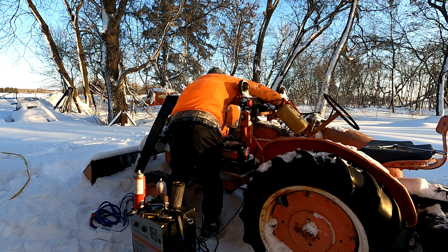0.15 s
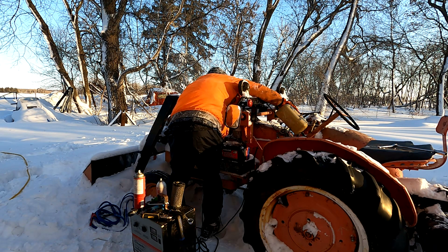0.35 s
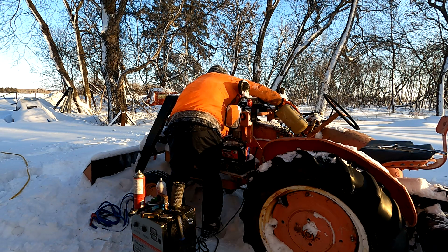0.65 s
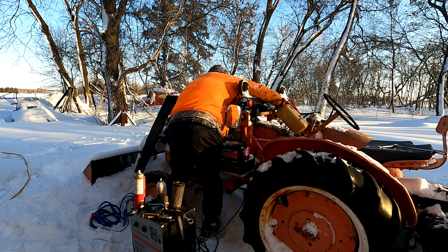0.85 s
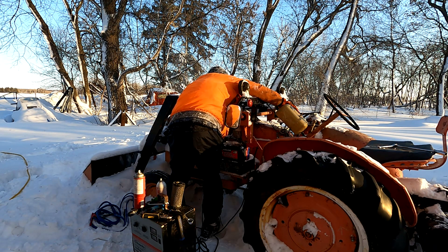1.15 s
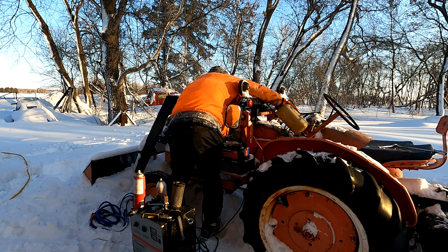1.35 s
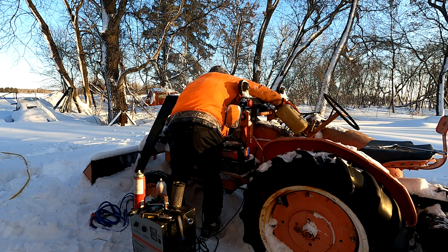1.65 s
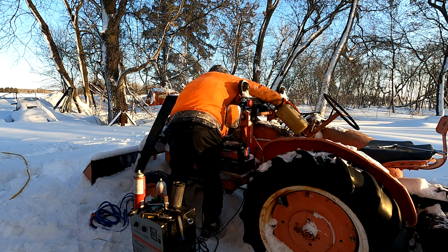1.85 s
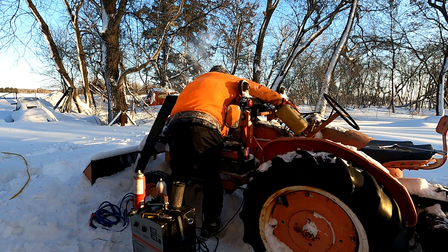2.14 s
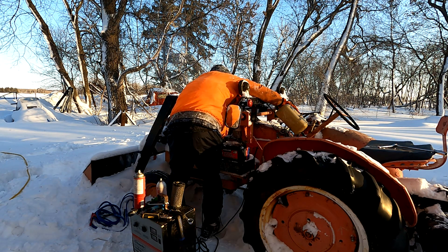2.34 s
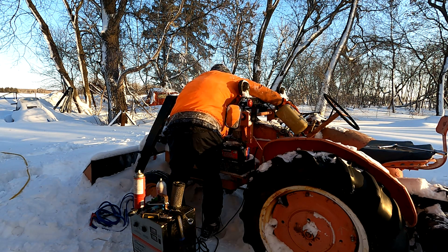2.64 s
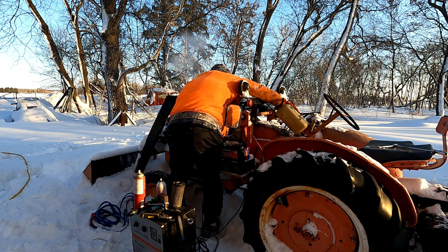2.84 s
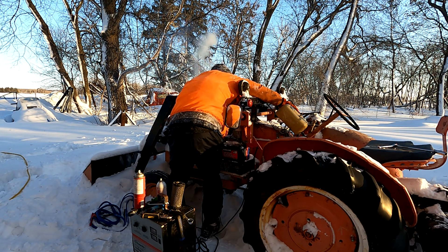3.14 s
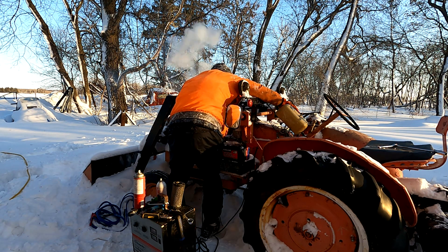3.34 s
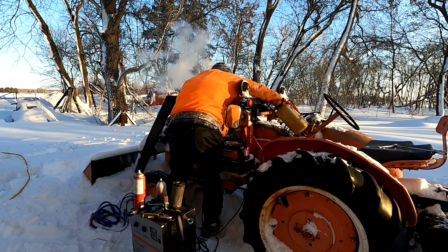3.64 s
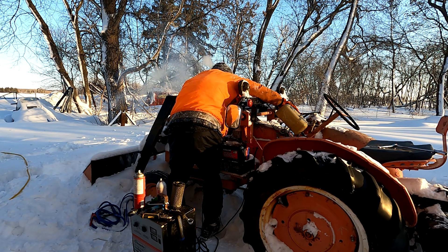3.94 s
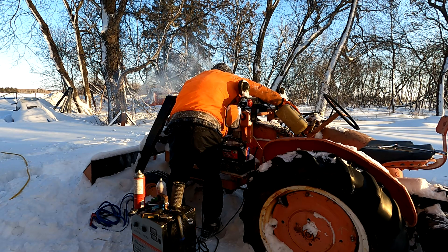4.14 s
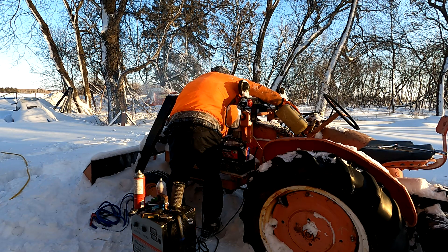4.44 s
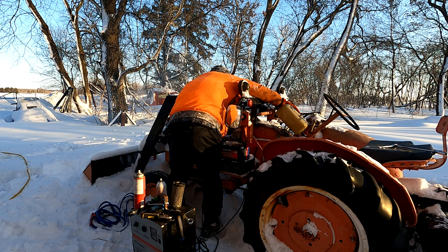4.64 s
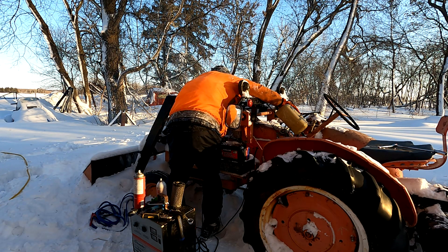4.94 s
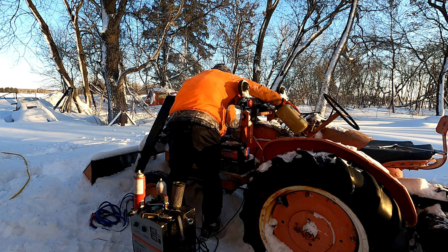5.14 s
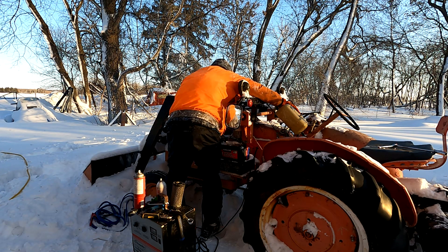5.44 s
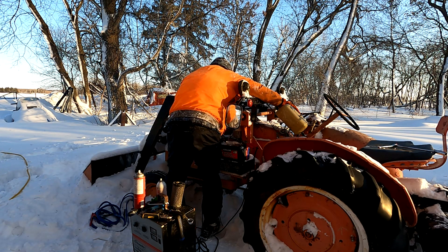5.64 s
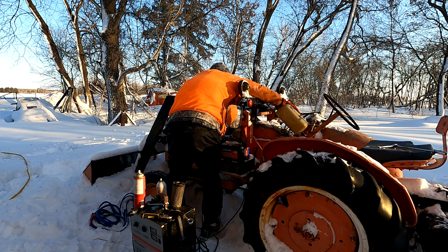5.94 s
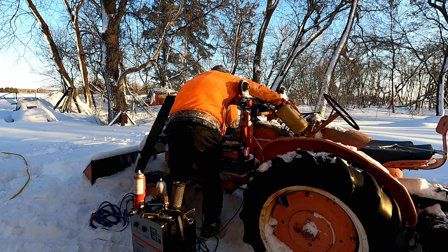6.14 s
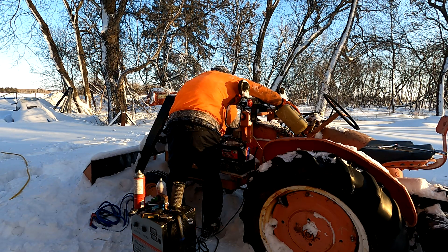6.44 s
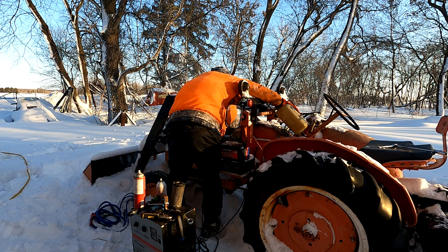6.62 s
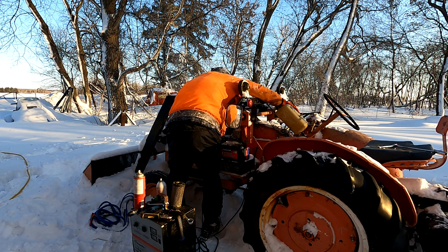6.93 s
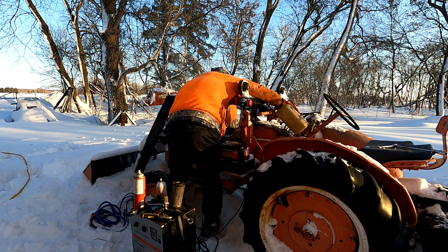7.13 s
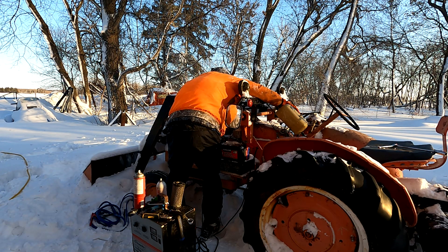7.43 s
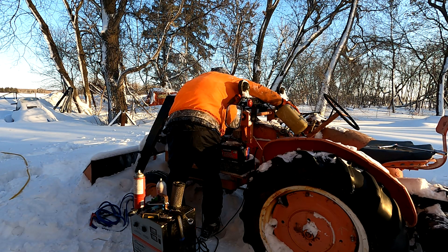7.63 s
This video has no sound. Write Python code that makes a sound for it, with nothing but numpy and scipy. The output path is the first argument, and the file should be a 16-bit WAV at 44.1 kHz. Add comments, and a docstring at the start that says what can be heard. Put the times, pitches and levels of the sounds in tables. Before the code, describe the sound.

Harsh gear-tooth grinding with low exhaust puffs and metallic clashes, then a freed starter motor races briefly, slows and fades into still winter air.

```python
"""Starting a cold tractor

An electric starter cranks a tractor engine: gear teeth grind, howl and clash, built from clicks and noise
ringing iron resonances. Cylinders puff into the exhaust as short low pulses, and some cough with added hiss.
The pinion (the starter's small gear) lets go; the freed starter races, slows and fades, as a stack of
tones tied to its speed plus rattle and brush noise. Quiet air and a humming battery charger run throughout."""
import sys
import numpy as np
from scipy import signal
from scipy.fft import rfft, irfft
from scipy.io import wavfile
from scipy.ndimage import uniform_filter1d

SR = 44100
rng = np.random.default_rng(int(sys.argv[2]) if len(sys.argv) > 2 else 0)


def unload_audio(sound):
    """Save the sound as a 16-bit wav file, at the path given as the first command line argument."""
    columns = np.transpose(np.atleast_2d(sound))
    # keep every value between -1 and 1, then stretch to whole-number steps
    steps = np.round(np.clip(columns, -1, 1) * 32767)
    wavfile.write(sys.argv[1], SR, steps.astype(np.int16))


N = 343098
T = np.arange(N) / SR  # time of every sample [s]

# Turning speed of the ring gear, dragged by the starter, then driven by coughs:
# (time [s], speed [teeth per second])
CRANK_SPEED = [(0, 335), (.18, 352), (.31, 385), (.45, 422), (1.94, 415), (2.06, 382), (2.2, 420),
               (2.72, 424), (2.86, 695), (4.2, 680)]
# Early coughs that throw the flywheel ahead: (time of top speed [s])
SURGES = [0.67, 1.45, 1.66, 2.26, 2.385]
# Course of each such surge: (time from its top [s], extra speed [teeth per second])
SURGE = [(-.17, 0), (0, 205), (.08, 120), (.16, 64), (.235, 56), (.3, 0)]
# Load on the starter, before the trims of each sound: (time [s], level [dB])
STARTER_LOAD = [(0, -22.5), (.7, -24.5), (1.1, -26), (2.07, -26.5), (2.11, -34.5), (2.37, -33),
                (2.43, -27.5), (2.67, -26.5), (2.71, -34), (2.9, -31.5), (4.14, -34.5), (4.3, -38.5)]
# Teeth clashing as the flywheel jerks ahead and falls back on the pinion:
# (middle time [s], level [dB], length [s], ringing note [Hz])
CLASHES = [(1.596, -21.5, 0.012, 1329), (2.167, -21, .032, 1921), (2.214, -24, 0.018, 1846),
           (2.258, -22, 0.039, 997), (2.357, -20.5, .027, 1390), (2.412, -24.5, 0.021, 1247),
           (2.502, -25, 0.015, 1087), (2.621, -29, .022, 839), (2.744, -21.5, 0.03, 1347),
           (2.789, -23.5, 0.044, 1103), (2.863, -23.5, .04, 1754), (2.974, -20.5, 0.035, 760),
           (3.042, -22.5, .032, 1896), (3.136, -24, 0.036, 882), (3.177, -24, .04, 894),
           (3.237, -21, 0.029, 1265), (3.308, -24, .05, 1150), (3.362, -29, .025, 2570),
           (3.441, -20.5, 0.039, 1440), (3.508, -21.5, .031, 1322), (3.557, -24, 0.042, 1114),
           (3.618, -29.5, 0.025, 2570), (3.699, -20, 0.048, 1354), (3.783, -22.5, .03, 1334),
           (3.834, -24, 0.033, 995), (3.888, -28.5, 0.023, 974), (3.985, -22, 0.058, 828),
           (4.073, -22, .027, 2550), (4.115, -23, 0.028, 1863), (4.155, -33, 0.024, 3057)]
# Barks of the bell housing: (middle time [s], pitch [Hz], level [dB])
BARKS = [(2.79, 560, -23.5), (2.853, 590, -22), (3.303, 576.3, -17.5), (3.56, 540, -23), (3.772, 580, -25),
         (3.823, 540, -17), (3.98, 554, -23), (4.06, 592, -24), (4.105, 560, -21.5)]
# Resonances of the iron castings: (frequency [Hz], width [Hz], boost [dB])
IRON = [(485.7, 15.6, 15.5), (607, 125, 7.5), (837, 52, 7), (912, 13, 6.5), (984, 22, 5.5), (1061, 12, 9),
        (1153, 18, 6), (1204, 13, 5.5), (1317, 62, 8.5), (1685, 14, 7), (1740, 10, 7.5), (1832, 65, 6.5),
        (1926, 37, 5), (2090, 80, 4), (2390, 42, 2), (2540, 94, 9.5), (2720, 62, 6), (3390, 140, 6)]
# Low resonances of the starter housing and sheet metal:
# (frequency [Hz], width of each filter pass [Hz], relative level [dB])
HOUSING = [(272.4, 15.7, -6.5), (290, 29, -3.5), (348.2, 33.7, 3), (482.5, 18.6, -2.5)]
# The howl swells where the teeth meet a resonance: (frequency [Hz], gain [dB])
HOWL = [(190, -32), (250, -22), (276, -15.5), (320, -26.5), (347, -13), (385, -30.5), (440, -31.5),
        (478, -14), (505, -22), (545, -23), (630, -27.5), (740, -38.5)]
# Cylinders that cough into the exhaust: (time [s], thump level before trim [dB])
COUGHS = [(0.492, -16), (0.582, -17.5), (0.657, -19.5), (1.352, -14.5), (1.437, -14.5), (1.587, -17.5),
          (1.654, -17), (2.111, -15), (2.245, -13.3), (2.31, -15), (2.714, -17), (2.865, -13.5),
          (2.927, -14), (3.113, -15), (3.239, -15.5), (3.364, -16), (3.618, -15), (3.886, -15),
          (4.153, -14)]
# Hiss grows faster than thump: (thump level before trim [dB], hiss level before trim [dB])
HISS_LAW = [(-33.5, -52.5), (-17, -42), (-13.5, -32.5)]
# Orders of the shaft, first order first:
# (coasting level [dB], extra under power [dB], loss below the smooth speed [dB per Hz])
SHAFT_ORDERS = [(3.5, -3, 0), (0, 13.5, 1.1), (-2, 14.5, 1.2), (1, 8.5, 2), (-9.5, 1, 0), (-11, 8.5, 0),
                (-13.5, 4, 0.5), (-19, 12.5, 0.5)]
# Resonances of the frame, through which the orders glide: (frequency [Hz], gain [dB])
FRAME = [(31, -46.5), (44, -29.5), (51, -43), (67, -23), (77, -42), (85, -28), (104, -36.5), (136, -27),
         (160, -37.5), (180, -55.5), (200, -30), (222, -38), (243, -47), (265, -29.5), (288, -27.5),
         (312, -29), (345, -21.5), (368, -25.5), (388, -36.5), (402, -36.5), (440, -37), (495, -29.5),
         (550, -36.5), (620, -26), (720, -37.5), (830, -29.5)]
# Short ringing notes: knocks on the metalwork, and at 2.03 s the howl dipping through a resonance:
# (time [s], pitch [Hz], level [dB], time to fall 60 dB [s])
RINGING_NOTES = [(0.432, 143, -16, 0.17), (2.028, 352, -11, 0.21), (3.675, 347, -12, 0.29),
                 (6.325, 362, -41, 0.7), (6.865, 352, -45, 0.76)]
# Notes of a faint high metallic ring: (pitch [Hz], relative level [dB], time to fall 60 dB [s])
HIGH_RING = [(3752, 0, .14), (5852, -2, .2), (7467, -10, .12), (10060, -16, .1)]
# Soft bumps of the chassis: (time [s], relative level [dB])
BUMPS = [(4.565, -31), (6.47, -45), (6.52, -41), (6.56, -47), (6.745, -39), (6.82, -49), (6.975, -47),
         (7.015, -52), (7.24, -67)]
# Faint crunching scuffs: (peak time [s], level [dB], rise [s], fall [s])
SCUFFS = [(6.275, -39, 0.11, 0.085), (6.768, -45.5, 0.01, 0.065), (7.137, -47.5, 0.011, 0.05),
          (7.24, -49.5, 0.017, 0.054), (7.372, -51.5, 0.025, 0.07), (7.572, -51.5, 0.044, 0.038)]
# Hum of the battery charger: (frequency [Hz], level [dB])
HUM = [(119.5, -52.5)]

# Tone colours of the noises, all: (frequency [Hz], relative level [dB])
# loaded gear teeth
GRIND = [(60, -9.5), (130, -7.5), (225, -2.5), (290, -9.5), (420, 0.5), (720, -3.5), (1200, -1.5),
         (2250, -5.5), (3100, -9.5), (4000, -12), (5000, -14.5), (6000, -21), (8300, -24), (10500, -39.5),
         (12500, -37.5), (15500, -56)]
# bright hissing noise at the start: (frequency [Hz], relative level [dB])
OPENING_HISS = [(500, -3), (1100, 26.5), (1500, 13.5), (3000, 6.5), (5500, 2), (7300, 2), (9000, -8),
                (10500, -5.5), (14000, -34)]
# hiss of coughs, also used for the pinion's tick: (frequency [Hz], relative level [dB])
COUGH = [(80, 8), (200, 19), (320, 20.5), (500, 18), (1300, 3), (2500, 15.5), (4500, 9), (7500, 4),
         (9000, -0.5), (11000, -9.5), (12500, -7), (15500, -21)]
# rattle of the free rotor: (frequency [Hz], relative level [dB])
RATTLE = [(120, 2), (230, -4.5), (330, 4.5), (430, -1.5), (600, -1.5), (1000, -6), (1500, -12.5),
          (2500, -15.5), (3300, -20.5), (4500, -25.5), (8000, -32.5), (10500, -47), (12500, -48),
          (15500, -57.5)]
# starter brushes: (frequency [Hz], relative level [dB])
BRUSH = [(1500, -10), (2800, -3), (3500, 8.5), (4400, 8.5), (6000, -8), (8000, -16), (14000, -20)]
# scuffs: (frequency [Hz], relative level [dB])
SCUFF = [(150, -6.5), (330, 16), (750, 2.5), (1200, -1), (2000, -12.5), (5000, -24), (12000, -43)]
# still air: (frequency [Hz], relative level [dB])
AIR = [(20, 13), (45, 5), (90, 2.5), (190, -0.5), (340, 3.5), (450, -6), (800, -22.5), (1200, -9.5),
       (2100, -19), (3400, -14.5), (7500, -23.5), (10500, -34), (12200, -36.5), (15500, -54.5)]

# Stereo spread with the image fully open: (frequency [Hz], side against middle [dB])
WIDTH = [(60, -29.5), (380, -24.5), (700, -10), (1300, -7), (4400, -4.5), (9000, -6), (15000, -18.5)]
# Treble spread that stays throughout: (frequency [Hz], side against middle [dB])
SPARKLE = [(2000, -50), (7000, -26), (10500, -20), (11800, -1), (15000, -1)]
# How far the stereo image is open: (time [s], level against fully open [dB])
IMAGE = [(0, 0), (.3, -1.5), (.7, -11), (1.1, -24), (1.6, -62), (6.2, -43.5), (6.65, -13), (7.78, -5.5)]

# Between coughs the cylinders only puff, about once for this many teeth of the ring gear
FIRST_STROKE_S, TEETH_PER_STROKE = 0.042, 45
PUFF_DB, PUFF_SPREAD_DB = -27, 1.5  # before the exhaust's trims
# Compression slows the crank [teeth per second], unless a surge this fast carries it through
SAG_HZ, SAG_LAG_S, SAG_HOWL_DB, CARRY_HZ = 67.82, 0.014, -1, 54.94
# The howl needs a firm load and ends when the engine outruns the starter
FIRM_LOAD_DB, HOWL_END_S = -24.5, 2.69
DRONE_DB, DRONE_FOLLOW = -28.5, 0.31  # level at firm load, share of load changes followed
HISS_DB, HISS_HOLD_S, HISS_FADE_DB_PER_S = -27.5, 0.31, 55  # opening hiss
RING_DB, RING_T60_S, RING_RISE_S = -0.7, 0.13, 0.004  # note of a clash, level against the clash
BARK_S, BARK_ROUGH = 0.026, 0.5

# The freed rotor races toward its top speed, loses power, then coasts and fades
FREE_S, POWER_OFF_S, COAST_S, FADE_S = 4.22, 4.67, 4.72, 6.22
FREE_HZ, TOP_HZ, RACE_S, SLOW_S = 67.64, 106.55, 0.2, 1.25  # turns per second, time constants
FULL_POWER_S, POWER_RISE_S, POWER_FALL_S = 4.37, 0.093, 0.07
NOISE_RISE_S, NOISE_FALL_S = 0.25, 0.11  # rotor noises build up and ebb with the power
# Below the smooth speed low overtones die away; each higher order flutters more
SMOOTH_HZ, FLUTTER = 59.4, 0.089
# Rotor noises: (drive at top speed [dB], slope [dB per octave of speed], extra under power [dB])
ROTOR_RATTLE, ROTOR_BRUSH = (-37, 7.5, 11), (-59.5, 4.6, 7.1)
RUB_DB = 4  # swing either way, once a turn under power


def crank():
    """Find the gear speed, how hard it labours (0-1) and the stroke times, slowed by compression."""
    extra_hz = np.max([np.interp(T - s, *np.transpose(SURGE)) for s in SURGES], axis=0)
    steady_hz = curves(CRANK_SPEED)[1] + extra_hz
    teeth = np.cumsum(steady_hz) / SR
    strokes = [FIRST_STROKE_S]
    for cough_s, _ in COUGHS:
        # share out the teeth up to the next cough evenly among whole strokes
        first, last = np.interp([strokes[-1], cough_s], T, teeth)
        count = max(round((last - first) / TEETH_PER_STROKE), 1)
        stroke_teeth = np.linspace(first, last, count + 1)[1:]
        strokes += list(np.interp(stroke_teeth, teeth, T))
    labour = np.clip(1 - extra_hz / CARRY_HZ, 0, 1)
    stroke_count = np.interp(T - SAG_LAG_S, strokes, np.arange(len(strokes)))
    compression = np.cos(2 * np.pi * stroke_count)
    return steady_hz - SAG_HZ * labour * compression, labour, strokes


def gears(teeth_hz, labour, strokes, click_share=0.31, flutter_db=1.5, jitter=0.012):
    """Teeth strike and scrape unevenly, ringing the castings; the housing drones under the load."""
    on, load_db = curves(STARTER_LOAD)
    turns = np.cumsum(teeth_hz * (1 + jitter * wander(60))) / SR  # counted in teeth
    backlash = turns + 0.2 * wander(300)
    clicks = impacts(backlash, spread_db=1)
    teeth = np.sqrt(click_share) * clicks + np.sqrt(1 - click_share) * noise()
    teeth = evened(teeth * gain_of(flutter_db * wander(63)))
    grind = colour(teeth * on * gain_of(load_db - 2.0), GRIND, IRON, band=(900, 4000))

    # bright hissing noise at the start, fading after a third of a second
    hiss_db = HISS_DB - HISS_FADE_DB_PER_S * np.maximum(T - HISS_HOLD_S, 0)
    opening_hiss = colour(noise() * gain_of(1.9 * wander(110) + hiss_db), OPENING_HISS)

    drone = evened(sum(gain_of(db) * resonate(noise(), hz, width) for hz, width, db in HOUSING))
    # driven hard, the drone varies less than a free resonance
    drone = evened(drone / np.sqrt(abs(uniform_filter1d(drone ** 2, size=1100)) + 0.31))
    # it surges as each piston comes over the top, and is shaken by each clash
    piston_db = 1.8 * sum(swell(s + SAG_LAG_S, 0.061) for s in strokes)
    shake_db = 3 * sum(swell(s + 0.0099, 0.045) for s, *_ in CLASHES)
    follow_db = DRONE_FOLLOW * (load_db - FIRM_LOAD_DB)
    drone_db = DRONE_DB + follow_db + piston_db + shake_db + 2.3 * wander(22)

    note = howl(turns, load_db - FIRM_LOAD_DB + SAG_HOWL_DB * labour)
    # the clashes use the tooth noise backwards, so they do not repeat the grind beneath them
    return grind + clashes(teeth[::-1]) + opening_hiss + note + on * gain_of(drone_db) * drone


def howl(turns, load_db, rough=0.32, overtone_db=(-35, -38.5, -44)):
    """The ragged tooth beat rings the housing's resonances; its overtones ring the castings."""
    turn = np.exp(2j * np.pi * turns)
    raggedness = np.sqrt(rough) * (wander(85) + 1j * wander(85))
    beat = (np.sqrt(2 - 2 * rough) + raggedness) * turn
    overtones = sum(gain_of(db) * (1 + 0.45 * (wander(35) + 1j * wander(35))) * turn ** k
                    for k, db in enumerate(overtone_db, 2))
    meshed = gate(0, HOWL_END_S)
    note = colour(beat.real * meshed * gain_of(np.minimum(0.73 * load_db, 0)), HOWL, band=None)
    flat = [(0, 0.027)]
    return note + colour(overtones.real * meshed * gain_of(load_db), flat, IRON[1:], band=None)


def clashes(teeth, mode_db=3.75, chatter_db=0.5):
    """Each clash is a short tooth chatter plus one ringing iron note; the bell housing barks at times."""
    out, t = np.zeros(N), np.arange(-4096, 4096) / SR
    hz, age = np.fft.rfftfreq(len(t), 1 / SR), t - t[0]
    iron = colour(teeth * gain_of(chatter_db * wander(136)), GRIND, IRON[1:], band=(900, 4000))
    dying = (1 - np.exp(-age / RING_RISE_S)) * gain_of(RING_DB - 60 * age / RING_T60_S)
    chances = rng.standard_normal((len(CLASHES), 60))
    for (s, db, length, note_hz), luck in zip(CLASHES, chances):
        rising, falling = (2.15 * t / length) ** 2, abs(1.53 * t / length) ** 1.53
        shape = np.exp(-np.minimum(np.where(t < 0, rising, falling), 50))
        start = round((s + t[0]) * SR)
        # every clash favours its own mix of frequencies
        favour = gain_of(mode_db * np.interp(hz, np.geomspace(500, 12000, num=len(luck)), luck))
        chatter = irfft(rfft(iron[start:start + len(t)] * shape) * favour)
        chatter *= np.linalg.norm(shape) / np.linalg.norm(chatter)
        add(out, s + t[0], gain_of(db) * chatter)
        add(out, s - length / 3, gain_of(db) * dying * np.sin(2 * np.pi * note_hz * age))
    ragged = 1 + BARK_ROUGH * (wander(119.8) + 1j * wander(110))
    barks = sum(gain_of(db) * swell(s, BARK_S) * np.exp(2j * np.pi * f * T) for s, f, db in BARKS)
    return out + np.sqrt(2) * (ragged * barks).real


def exhaust(strokes, pipe_hz=42, rise=0.011, sharpness=0.61, hiss_lead=0.018, hiss_rise=0.022):
    """Each stroke rings the pipe briefly and booms in the muffler; gas hiss grows with the thump."""
    thumps, hisses, booms = np.zeros(N), np.zeros(N), np.zeros(N)
    t = np.arange(SR // 5) / SR
    ring = (t / rise * np.exp(1 - t / rise)) ** sharpness * -np.sin(2 * np.pi * pipe_hz * t)
    puff = (t / hiss_rise * np.exp(1 - t / hiss_rise)) ** 2
    for s, luck in zip(strokes, rng.standard_normal(len(strokes))):
        puff_db = PUFF_DB + PUFF_SPREAD_DB * luck
        thump_db = next((db for at, db in COUGHS if np.isclose(at, s)), puff_db)
        hiss_db = np.interp(thump_db, *np.transpose(HISS_LAW)) - 4.5
        boom_db = thump_db - 20 + 6 * (s > HOWL_END_S)  # booms are louder once the howl has ended
        add(thumps, s, gain_of(thump_db + 4.0) * ring)
        add(booms, s, gain_of(boom_db) * puff)
        add(hisses, s - hiss_lead, gain_of(hiss_db) * puff)
    gas = evened(noise() * gain_of(1.7 * wander(260)))
    hiss = colour(hisses * gas, COUGH, band=(6000, 14000))
    # the cranked engine shakes on its tyres
    shudder = curves(STARTER_LOAD)[0] * gain_of(-36) * resonate(noise(), 52.0, 94)
    return thumps + shudder + booms * resonate(noise(), 125, 150) + hiss


def free_starter(jitter=0.0027, buzz_share=0.69, scrape_share=0.54):
    """The unloaded rotor hums at multiples of its speed and buzzes and scrapes as it races, then slows."""
    racing_s = np.clip(T, FREE_S, COAST_S) - FREE_S
    raced_hz = TOP_HZ - (TOP_HZ - FREE_HZ) * np.exp(-racing_s / RACE_S)
    shaft_hz = raced_hz * np.exp(-np.maximum(T - COAST_S, 0) / SLOW_S)
    on = gate(FULL_POWER_S, FADE_S, rise=FULL_POWER_S - FREE_S + 0.078)
    turning = gate(FREE_S, FADE_S, rise=0.1, fall=1.0)
    power = gate(FULL_POWER_S, POWER_OFF_S, POWER_RISE_S, POWER_FALL_S)
    noise_power = gate(FULL_POWER_S, POWER_OFF_S, NOISE_RISE_S, NOISE_FALL_S)
    rattle_db, brush_db = (db + slope * np.log2(shaft_hz / TOP_HZ) + extra * noise_power
                           for db, slope, extra in (ROTOR_RATTLE, ROTOR_BRUSH))
    turns = np.cumsum(shaft_hz * (1 + jitter * wander(30))) / SR

    below_hz = np.maximum(SMOOTH_HZ - shaft_hz, 0)
    hum = np.zeros(N)
    for k, (db, extra_db, loss) in enumerate(SHAFT_ORDERS, 1):
        order_db = read(FRAME, k * shaft_hz) + db + extra_db * power - loss * below_hz
        tone = np.cos(2 * np.pi * (k * turns + rng.random()))
        hum += gain_of(order_db) * tone * (1 + FLUTTER * k * wander(28))

    # the higher orders come and go, each at its own moments, and blur into scraping noise
    wobble, flicker = turns + 0.0066 * wander(90), wander(9.2)
    buzz = np.zeros(N)
    for k in range(len(SHAFT_ORDERS) + 1, 20):
        tone = np.cos(2 * np.pi * (k * wobble + rng.random()))
        buzz += tone * (1 + 0.75 * np.roll(flicker, k * SR // 4)) * min(1, (10 / k) ** 2)
    # under power the rotor rubs harder once in every turn
    rub_db = RUB_DB * power * np.cos(2 * np.pi * turns)
    scrape = evened(noise() * gain_of(rub_db + 0.5 * wander(73)))
    drive = scrape_share * scrape + on * np.sqrt(4 * buzz_share * shaft_hz / SR) * buzz
    # resonances: (frequency [Hz], width [Hz], boost [dB])
    modes = [(284.0, 64, 8.2), (343.0, 21, 9.7), (504, 71, 6.5), (830, 41, 2.6),
             (1500, 56, 6), (1850, 100, 5.4), (2440, 92, 3.9)]
    rattle = colour(drive * turning * gain_of(rattle_db), RATTLE, modes, band=(500, 2500))

    # the brushes sing narrowly, a little lower once the rotor is slow
    slow = np.clip((64 - shaft_hz) / 14, 0, 1)
    high_song, low_song = resonate(noise(), 3550, 460), resonate(noise(), 3430, 200)
    song = np.sqrt(1 - slow) * high_song + np.sqrt(slow) * low_song
    brush_noise = colour(noise(), BRUSH, band=(3000, 4200))
    brushes = turning * gain_of(brush_db) * (1.25 * song + 0.8 * brush_noise)
    return on * hum + rattle + brushes


def rings_and_tick(ring_s=3.9, tick_s=4.572, tick_db=-31):
    """Short fading notes, a faint high ring while the gears still clash, and the pinion's tick on its stop."""
    out, ticks, t = np.zeros(N), np.zeros(N), np.arange(SR // 3) / SR
    for at, hz, level_db, t60 in RINGING_NOTES:
        fade = gain_of(level_db - 60 * t / t60) * (1 - np.exp(-t / 0.0048))
        add(out, at, fade * np.sin(2 * np.pi * hz * t))
    ring = sum(gain_of(db - 60 * t / t60) * np.sin(2 * np.pi * hz * t) for hz, db, t60 in HIGH_RING)
    burst = 1.2 * np.exp(-t / 0.009) * rng.standard_normal(len(t))
    add(out, ring_s, (1 - np.exp(-t / 0.0011)) * gain_of(-44) * (ring + burst))
    add(ticks, tick_s, gain_of(tick_db) * np.exp(-t / 0.0097))
    return out + colour(ticks * noise(), COUGH, band=(900, 16000))


def yard():
    """Shaped noise makes still winter air, bumps and scuffs; a wavering tone makes the charger's hum."""
    air = gain_of(-51) * colour(noise(), AIR) * gain_of(0.95 * wander(6.9))
    hum = sum(np.sqrt(2) * gain_of(db) * np.sin(2 * np.pi * (hz * T + rng.random())) for hz, db in HUM)
    bumps, t = np.zeros(N), np.arange(SR // 4) / SR
    for s, db in BUMPS:
        add(bumps, s, gain_of(db) * np.exp(-t / 0.043) * (1 - np.exp(-t / 0.0022)))
    low = resonate(noise(), 45, 40) + 0.19 * resonate(noise(), 315, 170)
    crunch = evened(noise() * gain_of(3.0 * wander(200)))
    scuff_shape = sum(gain_of(db) * np.exp(-np.maximum((s - T) / rise, (T - s) / fall))
                      for s, db, rise, fall in SCUFFS)
    # resonances: (frequency [Hz], width [Hz], boost [dB])
    modes = [(360, 35, 4.2), (985, 70, 4.4), (1300, 100, 4.1)]
    scuffs = colour(crunch * scuff_shape, SCUFF, modes)
    return air + hum * (1 + 0.5 * wander(13)) + 1.45 * bumps * low + scuffs


def shimmer(x, wet=0.32, decay=0.0047, above_hz=2200):
    """Countless small modes of the metalwork keep the treble ringing for a moment."""
    t = np.arange(SR // 10) / SR
    b, a = signal.butter(2, above_hz, "high", fs=SR)
    tail = rng.standard_normal(len(t)) * np.exp(-t / decay)
    treble = signal.filtfilt(b, a, x)
    ringing = signal.oaconvolve(treble, tail / np.linalg.norm(tail))[:N]
    return x + (np.sqrt(1 - wet ** 2) - 1) * treble + wet * ringing


def scatter(x, spectrum):
    """A few milliseconds of diffuse reflections, with random phase at every frequency."""
    t = np.arange(SR // 20) / SR
    z = rfft(rng.standard_normal(len(t)) * np.exp(-t / 0.024))
    gain = gain_of(read(spectrum, np.fft.rfftfreq(len(t), 1 / SR)))
    return signal.oaconvolve(x, irfft(z / abs(z) * gain))[:N]


def gain_of(db):
    """Turn decibels into a multiplier."""
    return 10 ** (np.asarray(db) / 20)


def evened(x):
    """Scale a sound to an average (RMS) size of one."""
    return x / np.sqrt(np.mean(x ** 2) + 1e-20)


def read(points, hz):
    """Read a spectrum joined by straight lines over log frequency."""
    f, value = np.transpose(points)
    return np.interp(np.log(hz + 1), np.log(f + 1), value)


def curves(rows):
    """Give a gate that is open over the table's span, then each column at every sample."""
    s, *columns = np.transpose(rows)
    return [gate(s[0], s[-1])] + [np.interp(T, s, c) for c in columns]


def gate(start, end, rise=0.03, fall=0.1):
    """Fully open from start to end, with a straight fade on either side [s]."""
    return np.clip(1 + np.minimum((T - start) / rise, (end - T) / fall), 0, 1)


def add(mix, s, sound):
    """Lay a sound into the mix at time s."""
    part = mix[max(round(s * SR), 0):][:len(sound)]
    part += sound[:len(part)]


def noise():
    """White noise of unit size."""
    return rng.standard_normal(N)


def wander(hz):
    """Random drift of unit size, at rates up to about the given one."""
    f = np.fft.rfftfreq(2 * SR * 4, 1 / SR)
    return evened(irfft(rfft(noise(), 2 * len(f) - 2) * np.exp(-(f / hz) ** 2))[:N])


def swell(s, length):
    """A bell-shaped rise and fall around time s."""
    return np.exp(-np.minimum((2 * (T - s) / length) ** 2, 50))


def colour(x, spectrum, modes=(), band=(20, 16000)):
    """Filter by a spectrum with resonant bumps; a given band passes unit white noise at unit size."""
    size = 8192
    hz = np.fft.rfftfreq(size, 1 / SR)
    db = read(spectrum, hz) + sum(d / (1 + (2 * (hz - f) / w) ** 2) for f, w, d in modes)
    gain = gain_of(db)
    if band:
        gain = gain / np.sqrt(np.mean(gain ** 2 * (hz > band[0]) * (hz < band[1])))
    # fold the cepstrum forward, so the filter only responds after its input
    cepstrum = irfft(np.log(gain))
    cepstrum[1:size // 2] *= 2
    cepstrum[size // 2 + 1:] = 0
    return signal.oaconvolve(x, irfft(np.exp(rfft(cepstrum)))[:size // 2])[:N]


def resonate(x, hz, width):
    """A steep resonance of unit size: two band-passes in a row."""
    b, a = signal.iirpeak(hz, hz / width, SR)
    return evened(signal.lfilter(b, a, signal.lfilter(b, a, x)))


def impacts(turns, spread_db):
    """One click of random size for each whole turn."""
    hits = np.diff(np.floor(turns), prepend=0) > 0
    return evened(hits * gain_of(spread_db * np.clip(noise(), -2, 2)))


def scene():
    """The image starts wide and a little right, narrows except in the treble, and opens again later."""
    teeth_hz, labour, strokes = crank()
    machine = gears(teeth_hz, labour, strokes) + exhaust(strokes) + free_starter()
    mid = shimmer(machine) + rings_and_tick() + yard()
    opening = gain_of(curves(IMAGE)[1])
    lean = -0.11 * mid  # pulls the image to the right
    side = opening * (scatter(mid, WIDTH) + lean) + scatter(mid, SPARKLE)
    return np.array([mid + side, mid - side])


def record(dry):
    """A steep low-pass filter removes the highest treble."""
    edge_hz = 15650
    low_pass = signal.firwin(511, edge_hz, window=("kaiser", 9), fs=SR)
    return signal.oaconvolve(dry, low_pass[None], "same")


dry = scene()
out = record(dry)
unload_audio(out)
```